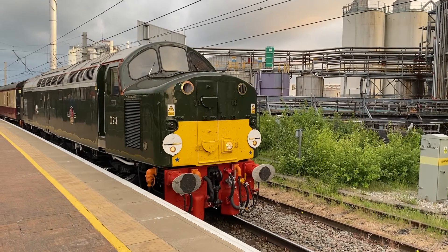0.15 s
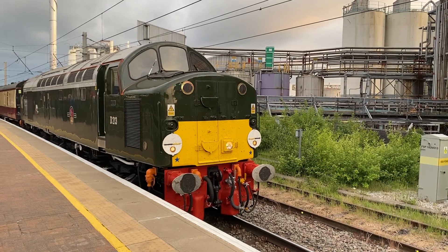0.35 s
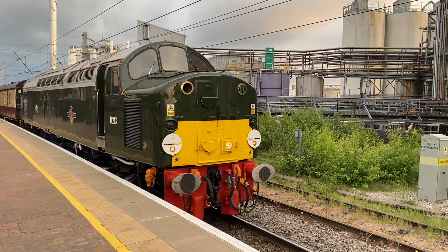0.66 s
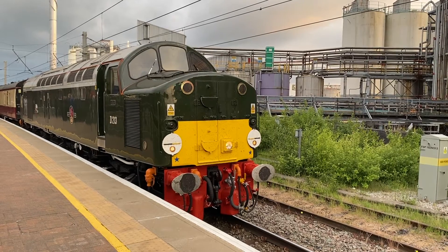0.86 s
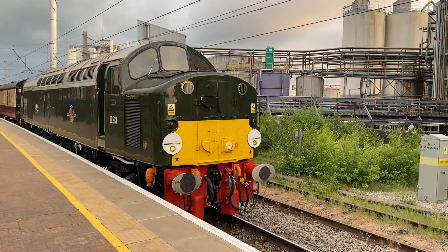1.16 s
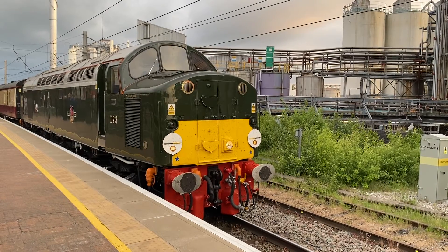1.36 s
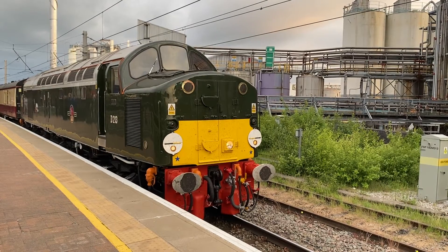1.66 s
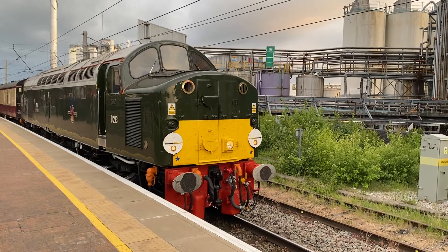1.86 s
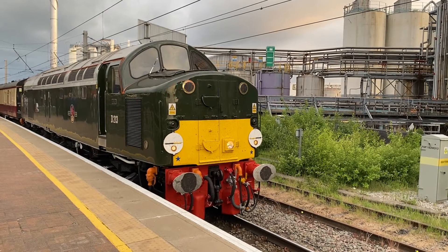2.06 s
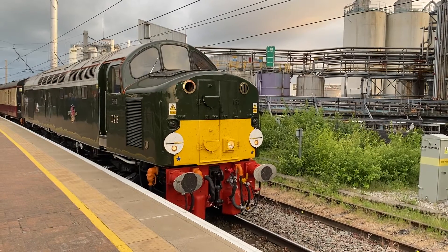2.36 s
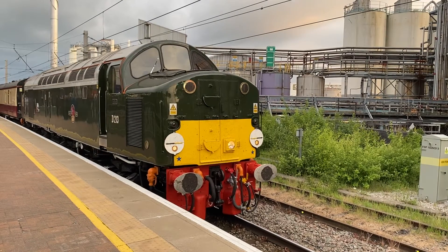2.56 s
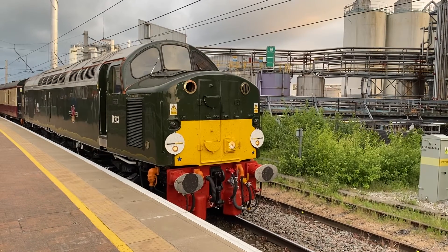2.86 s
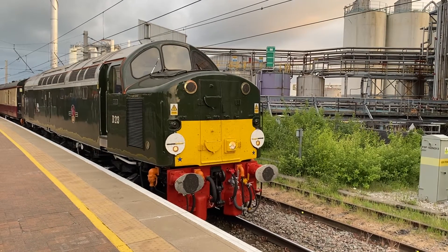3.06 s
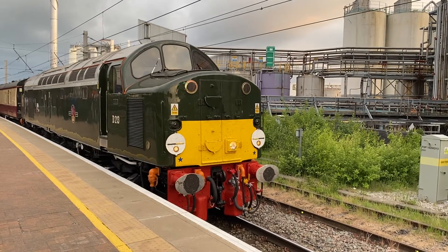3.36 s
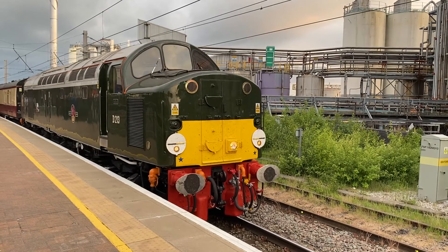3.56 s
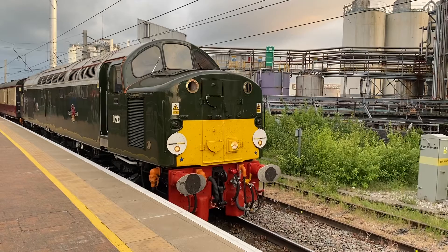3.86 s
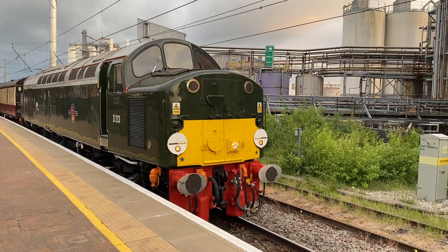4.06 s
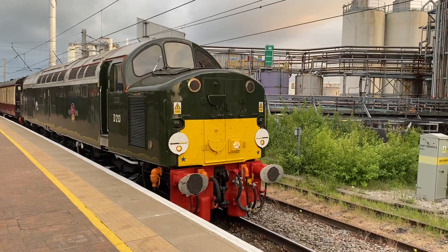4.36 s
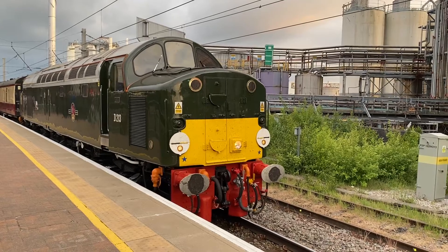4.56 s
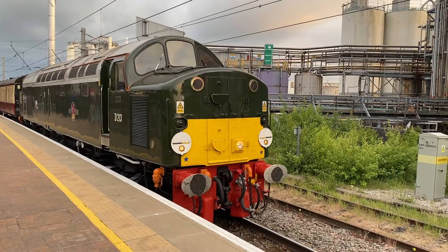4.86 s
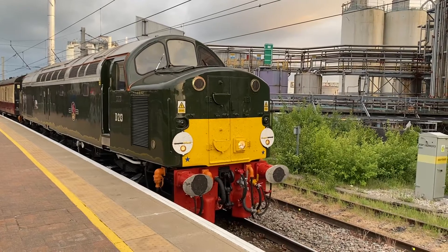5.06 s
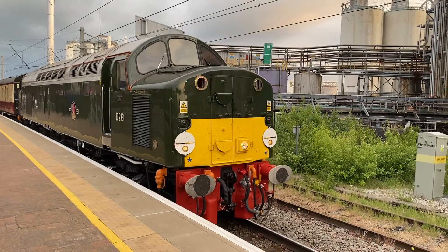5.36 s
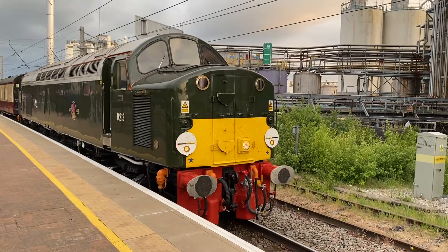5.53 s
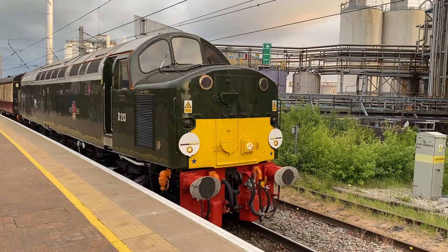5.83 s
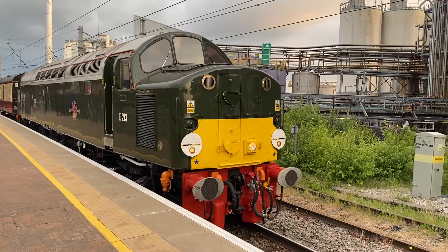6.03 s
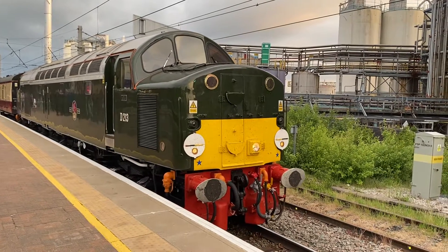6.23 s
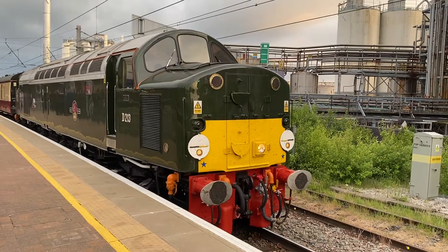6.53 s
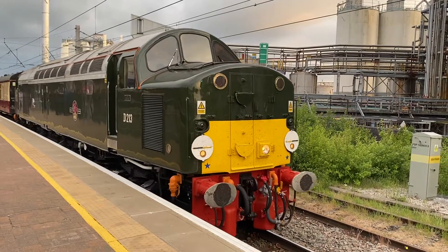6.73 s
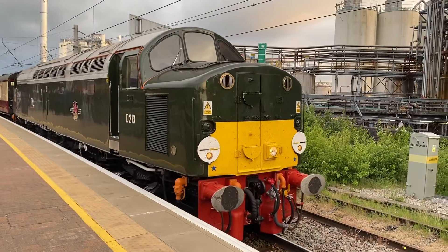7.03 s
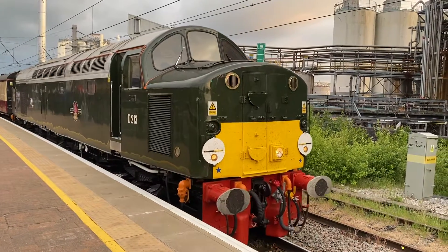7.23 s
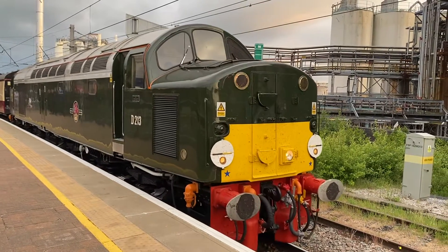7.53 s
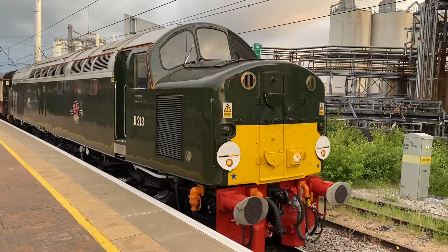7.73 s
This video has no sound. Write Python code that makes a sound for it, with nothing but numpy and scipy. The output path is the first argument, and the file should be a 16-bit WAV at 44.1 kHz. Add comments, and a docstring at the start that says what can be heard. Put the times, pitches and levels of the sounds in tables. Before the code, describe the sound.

A diesel locomotive draws slowly out of a station, heard from the platform. Its deep engine throbs and chuffs in a limping beat, gently speeding up and slowing over a steady rush of cooling fans. A high, breathy turbocharger whistle pulses with the exhaust, and a few dull metal knocks sound. Near the end the engine takes more power: the beats harden into loud barks and the whistle climbs in pitch.

```python
"""Diesel locomotive pulling out

A sixteen-cylinder diesel draws slowly out of a station, heard from the platform over its fans.
Its governor hunts; the exhaust throbs and chuffs in a limping beat, and the turbocharger whistles
with each gust. After six seconds it takes more power: the beats harden into barks, the whistle climbs."""
import sys
import numpy as np
from scipy import signal
from scipy.fft import rfft, irfft, next_fast_len
from scipy.io import wavfile

SR = 44100
rng = np.random.default_rng(int(sys.argv[2]) if len(sys.argv) > 2 else 0)


def generate_wav(signal):
    """Clip the signal to [-1, 1] and save it as 16-bit WAV at the path in sys.argv[1]."""
    frames = np.transpose(np.atleast_2d(signal))
    scaled = np.clip(frames, -1, 1) * 32767
    pcm = np.round(scaled).astype(np.int16)
    wavfile.write(sys.argv[1], SR, pcm)


N = 347949
TIME = np.arange(N) / SR
TOP_HZ = 15900

# crankshaft speed as the governor hunts: t/s, speed/rpm
CRANK_SPEED = [(0.0, 453.7), (0.9, 446.0), (2.15, 482.4), (2.45, 480.8), (3.3, 448.1), (3.8, 448.6),
               (4.75, 478.4), (5.2, 479.0), (5.95, 431.5), (6.3, 430.3), (6.9, 451.6), (7.89, 448.4)]
# the limp, cylinders in firing order: chuff/dB, turbine gust/dB, thump/dB, lag through the pipe/ms
CYLINDERS = [(-5, -4.5, -1, 0.5), (-10.5, -14.5, -2, -1), (-9, -16, 0.5, 6), (-6, -15.5, -2, -2.5),
             (-4, 0.5, -6, 0), (-5.5, -19, 2, -3), (-3.5, 0, -2.5, -0.5), (-9, -5.5, 1, -5.5),
             (-11.5, -13, 0.5, 0), (-3.5, -12, -0.5, -3), (-2, 0, -2, -.5), (-12, -3.5, 0.5, 0),
             (-7.5, -4, -1.5, 4), (-6.5, -4.5, -3.5, -1), (-18, -14, -3.5, 4), (-3.5, -6, 0, -2)]
# boom in the exhaust pipes: t/s, level/dB
PIPE_BOOM = [(0, -21.5), (.7, -22.5), (1.2, -20), (2.2, -19.5), (3.05, -21.5), (3.5, -20), (4.4, -20.5),
             (4.95, -20), (5.3, -21), (5.65, -21), (6.3, -20), (7.05, -19.5), (7.89, -21)]


def amp(db):
    """Decibels to gain."""
    return 10 ** (np.asarray(db) / 20)


def unit(x):
    """Scales to rms 1."""
    return x / np.sqrt(np.mean(x ** 2) + 1e-20)


def curve(rows):
    """A time table as a smooth ride, one value per sample."""
    return np.interp(TIME, *np.transpose(rows))


def read(points, hz):
    """Reads a spectrum table on a log-frequency axis."""
    f, value = np.transpose(points)
    return np.interp(np.log(hz + 1), np.log(f + 1), value)


def colour(x, points, size=8192):
    """Minimum-phase EQ with the given spectrum."""
    log_gain = np.log(amp(read(points, abs(np.fft.fftfreq(size, 1 / SR)))))
    taps = np.fft.ifft(np.exp(np.conj(signal.hilbert(log_gain)))).real[:size // 2]
    return signal.oaconvolve(x, taps[None], axes=1)[:, :N]


def band(x, lo_hz, hi_hz):
    """Band-pass."""
    return signal.sosfilt(signal.butter(2, [lo_hz, hi_hz], btype="band", fs=SR, output="sos"), x)


def wander(rate_hz):
    """Random drift of rms 1."""
    knots = rng.standard_normal(N // 20)
    return unit(np.interp(TIME * rate_hz, np.arange(len(knots)), knots))


def noise():
    """Turbulence. Every source has two rows: its direct sound and its scattered sound."""
    return rng.standard_normal((2, N))


def puff(t, rise_s, order=4):
    """An envelope that swells, peaks at rise_s and dies away; higher orders are tighter."""
    u = np.maximum(t, 0) / rise_s
    return (u * np.exp(1 - u)) ** order


def gusts(impulses, rise_s, steady, order=4):
    """Gas flow: a puff for each impulse over a steady stream."""
    return unit(steady + signal.oaconvolve(impulses, puff(TIME[:SR // 8], rise_s, order))[:N])


def count_firings(start=14.76):
    """Running count of firings: every cylinder fires once in two revolutions."""
    revolutions = np.cumsum(curve(CRANK_SPEED) / 60) / SR
    return start + revolutions * len(CYLINDERS) / 2


def valve_kicks(firings, column, scatter_db, jitter_ms):
    """One impulse for each opening exhaust valve, sized and timed by its cylinder."""
    at = np.flatnonzero(np.diff(np.floor(firings)))
    size, slip = rng.standard_normal((len(at), 2)).T
    cylinder = np.array(CYLINDERS)[firings[at + 1].astype(int) % len(CYLINDERS)]
    lag = (cylinder[:, 3] + slip * jitter_ms) * SR / 1000
    out = np.zeros(N)
    out[np.clip(at + lag.astype(int), 0, N - 1)] = amp(cylinder[:, column] + scatter_db * size)
    return out


def machinery(rush_db=-32, whine_db=-41, whine_hz=501):
    """The bed: a steady rush of cooling fans and a faint auxiliary whine."""
    # colour of the machinery behind the grilles: f/Hz, level/dB
    grille_eq = [(30, -32), (120, -11.5), (300, 0), (430, -9), (520, 0.5), (660, 3.5), (900, -9),
                 (1600, -12), (1900, -17.5), (2300, -12), (3500, -17), (4400, -19.5), (6500, -30.5),
                 (12000, -35.5), (16000, -64)]
    out = amp(rush_db + wander(10)) * unit(colour(noise(), grille_eq))
    out[0] += amp(whine_db) * unit(np.sin(2 * np.pi * whine_hz * TIME + 1.27 * wander(3)))
    return out


def knocks(t60_s=0.083, overtone=1.243, overtone_db=-5):
    """Heavy steel running gear bumps and rings briefly as the train takes up its slack."""
    # dull knocks: t/s, f/Hz, level/dB
    bumps = [(.118, 273, -14.5), (2.772, 230, -13.5), (4.034, 515, -17), (6.345, 176, -7.5)]
    out = np.zeros((2, N))
    t = TIME[:SR // 4]
    for s, hz, db in bumps:
        ring = np.sin(2 * np.pi * hz * t) + amp(overtone_db) * np.sin(2 * np.pi * hz * overtone * t)
        out[0, int(s * SR):][:len(t)] += ring * amp(db) * np.exp(-np.log(1000) * t / t60_s)
    return out


def drone(firings, waver_db=1.66, waver_rad=0.61, pipe_hz=122.6, pipe_width_hz=3.2, pipe_db=6):
    """Clean engine notes waver, and swell whenever the speed tunes them to the exhaust pipe."""
    # engine notes: vibrations per engine cycle, level/dB relative to the boom
    orders = [(16, -5), (24, -14.5), (31, -9), (44, -18.5)]
    cycle_phase = 2 * np.pi * firings / len(CYLINDERS)
    cycle_hz = curve(CRANK_SPEED) / 60 / 2
    notes = np.zeros(N)
    for k, db in orders:
        in_tune = np.exp(-((k * cycle_hz - pipe_hz) / pipe_width_hz) ** 2)
        gain = amp(db + pipe_db * in_tune + waver_db * wander(3.416))
        notes += gain * np.sin(k * cycle_phase + waver_rad * wander(5))
    return np.sqrt(2) * np.outer([1, 0], notes * amp(curve(PIPE_BOOM)))


def turbine_flow(firings, delay_s=0.0058, width_s=0.00567, steady=0.251):
    """The manifold rounds each gust into an even swell on its way to the turbine."""
    t = np.arange(-SR // 20, SR // 20) / SR
    swell = np.exp(-((t - delay_s) / width_s) ** 2)
    kicks = valve_kicks(firings, column=1, scatter_db=1.5, jitter_ms=1.0)
    return unit(steady + signal.oaconvolve(kicks, swell, "same"))


def smear(tone, spread_hz):
    """Turbulence blurs a tone into a breathy band, spread_hz to either side."""
    lowpass = signal.butter(3, spread_hz, fs=SR, output="sos")
    return unit((tone * signal.sosfilt(lowpass, noise() + 1j * noise())).real)


def turbo(firings, breath_db=-2.5, surge_hz=5):
    """The blade note and its octave, pumped by each gust of exhaust, rougher as the rotor speeds up."""
    # blade note: t/s, f/Hz
    blade_note = [(0, 2868), (.75, 2855), (1.3, 2882), (2.2, 2934), (3.45, 2868), (4.2, 2924), (5, 3026),
                  (5.5, 3024), (5.9, 2962), (6.55, 3106), (7.1, 3325), (7.89, 3590)]
    # whistle fader: t/s, level/dB
    whistle_level = [(0, -30), (.9, -29.5), (1.9, -28), (3.4, -29.5), (4.9, -26), (5.7, -34), (6.35, -21.5),
                     (7.1, -21.5), (7.6, -26.5), (7.89, -32)]
    flow, pitch = turbine_flow(firings), curve(blade_note)
    boost = (pitch - pitch.min()) / np.ptp(pitch)
    tone = np.exp(2j * np.pi * np.cumsum(pitch + surge_hz * (flow - 1)) / SR)
    breath = amp(breath_db) * smear(tone, spread_hz=45)
    fuzz = amp(-7 + 12 * boost) * smear(tone, spread_hz=150)
    # the core of the note is unbroken but its pitch flutters, more so at high boost
    flutter_hz = 21 * (1 + 2 * boost) * np.array([wander(90), wander(90)])
    fluttering = tone * np.exp(2j * np.pi * np.cumsum(flutter_hz, axis=1) / SR)
    core = 1.9 * (1 - .7 * boost) * unit(fluttering.real * [[1], [.85]])
    octave = unit(smear(tone ** 2, spread_hz=115) + .5 * unit((fluttering ** 2).real))
    chirps = amp(-20 - 4 * boost) * octave * flow  # stands out on the strongest gusts
    return amp(curve(whistle_level)) * flow * unit(breath + fuzz + core + chirps)


def throb(firings, churn_db=-2):
    """The low end: pressure pulses boom in the pipes, each trailed by churning gas."""
    # colour of the pipes: f/Hz, level/dB
    pipe_eq = [(20, -43), (32, -15.5), (48, -6), (62, 4), (95, -5.5), (125, -3), (190, -11.5), (300, -19.5),
               (430, -27), (800, -32), (2000, -61.5), (6000, -95)]
    pulses = valve_kicks(firings, column=2, scatter_db=2.0, jitter_ms=1.526)
    gas = amp(churn_db) * noise() * gusts(pulses, rise_s=0.0069, steady=0.52)
    gas[0] += unit(pulses - pulses.mean())
    return amp(curve(PIPE_BOOM)) * unit(colour(gas, pipe_eq))


def chuffs(firings, roar_db=-32, hiss_db=-44, sing_db=-7, effort_cap_db=7):
    """Gas rushes from the stack in uneven puffs that grow with effort, up to a cap."""
    # colour of a soft chuff: f/Hz, level/dB
    chuff_eq = [(110, -20.5), (250, -0.5), (420, -5), (540, -1.5), (680, -6.5), (1000, -7.5), (1350, -15),
                (1550, -11.5), (2000, -20), (3500, -12), (4400, -18), (5400, -22), (7500, -24.5),
                (12000, -38.5), (15500, -42)]
    # two swings of the governor, then more power: t/s, effort/dB above light running
    effort = [(0, -1), (.8, 0), (1.85, 3), (2.8, -1), (3.5, 0.2), (4.1, 3.5), (4.9, 5), (5.55, 0.5),
              (5.95, 2.5), (6.3, 9), (6.8, 17), (7.4, 14), (7.89, 11.5)]
    effort_db = np.minimum(curve(effort), effort_cap_db)
    beats = valve_kicks(firings, column=0, scatter_db=1.5, jitter_ms=0.4)
    rush = noise() * gusts(beats, rise_s=0.0075, steady=0.55, order=2)
    jet = noise() * gusts(beats, rise_s=0.0055, steady=0.36, order=3)
    roar = unit(band(colour(rush, chuff_eq), 215, 2420))
    hiss = unit(band(colour(jet, chuff_eq), 1950, TOP_HZ))
    sing = amp(sing_db) * unit(band(jet, 3810, 4680))  # the jet sets the stack's metal singing
    return roar * amp(roar_db + effort_db) + (hiss + sing) * amp(hiss_db + effort_db)


def stack_ring(t, note_hz, spread=0.026, rise_s=0.022, gain_db=1):
    """The hollow note of the stack; the heat of each slug of gas detunes its weaker modes a little."""
    # modes of the stack: multiple of its note, level/dB
    stack_modes = [(0.589, -11), (0.801, -13), (1, 0.5), (1.09, -8), (1.52, -9.5)]
    multiple, db = np.transpose(stack_modes)
    detune = spread * rng.standard_normal(len(db)) * (db < db.max())
    cycles = np.outer(t, note_hz * multiple * (1 + detune)) + rng.random(len(db))
    ring = np.sin(2 * np.pi * cycles) @ amp(db)
    return amp(gain_db) * unit(ring) * puff(t, rise_s, order=7)


def barks(rise_s=0.02, trail_db=-17, body_db=-5, punch_db=-1, bore_db=-3):
    """Exhaust accents, each its own mix of hissing crack, hollow stack ring and low thud in the pipes."""
    # exhaust barks, light and hard, and a few low swells of the boom:
    # t/s, crack/dB, stack ring/dB, ring f/Hz, thud/dB, thud f/Hz
    accents = [(0.624, -37, -47, 855, -30, 165), (0.727, -41, -42, 900, -30, 60),
               (1.424, -35, -40, 990, -20, 115), (1.455, -44, -42, 865, -30, 70),
               (1.617, -31, -35, 850, -28, 75), (1.778, -39, -38, 920, -30, 60),
               (1.935, -32, -34, 987, -30, 136), (1.963, -38, -37, 920, -30, 65),
               (3.714, -42, -42, 1123, -23, 120), (3.838, -36, -38, 850, -34, 135),
               (4.009, -34, -42, 1005, -30, 60), (4.038, -35, -36, 850, -10.5, 65),
               (4.103, -34, -38, 907, -32, 121), (4.203, -33.5, -39, 1015, -32, 65),
               (4.267, -39, -42, 1065, -28, 151), (4.299, -37, -42, 1080, -30, 65),
               (4.364, -39, -40, 995, -32, 60), (4.462, -33, -42, 895, -30, 110),
               (4.525, -28.5, -42, 936, -30, 121), (4.554, -38, -34, 924, -32, 125),
               (4.619, -38, -28, 980, -27, 126), (4.78, -33, -34, 885, -36, 110),
               (4.809, -38, -45, 915, -28, 70), (4.871, -35, -40, 925, -30, 55),
               (4.968, -38, -45, 865, -37, 135), (5.029, -30.5, -42, 905, -30, 65),
               (6.082, -27.5, -44, 990, -30, 65), (6.115, -30.5, -30, 893, -9, 65),
               (6.185, -27, -21.5, 1009, -22, 60), (6.237, -33, -25, 845, -32, 110),
               (6.292, -24, -26, 915, -17.5, 135), (6.357, -22, -22, 937, -15, 105),
               (6.394, -27, -31, 966, -22, 70), (6.461, -24.5, -19.5, 1025, -12.5, 105),
               (6.515, -35, -24, 852, -12, 150), (6.565, -22, -30, 1024, -13, 104),
               (6.632, -21.5, -23.5, 1143, -15.5, 113), (6.663, -21.5, -24.5, 1012, -30, 55),
               (6.733, -21, -20.5, 900, -30, 70), (6.783, -30, -42, 880, -18, 55),
               (6.834, -19, -26.5, 935, -11.5, 85), (6.9, -20, -24.5, 927, -27, 80),
               (6.932, -22.5, -21, 945, -13, 70), (7, -23, -22, 1003, -10, 65),
               (7.047, -32, -45, 1035, -23, 60), (7.101, -22, -24.5, 941, -7.5, 70.4),
               (7.166, -22, -19.5, 990, -21, 110), (7.196, -26, -28.5, 954, -5.5, 70),
               (7.264, -24.5, -21.5, 1042, -30, 60), (7.315, -36, -26, 1035, -32, 135),
               (7.368, -21.5, -31, 876, -19, 95), (7.431, -22.5, -20, 931, -22, 125),
               (7.468, -27, -31, 880, -12, 70), (7.51, -34, -40, 860, -10, 65),
               (7.531, -27, -19, 896, -24, 75), (7.634, -23.5, -28, 860, -16.5, 95),
               (7.704, -25, -44, 925, -8.5, 109), (7.732, -27, -23, 929, -7.5, 69),
               (7.802, -29, -22.5, 856, -23, 70), (7.845, -34, -39, 990, -30, 129)]
    # colour of a bark: f/Hz, level/dB
    bark_eq = [(70, -9.5), (170, -3.5), (420, -4.5), (570, -3), (760, -7), (930, 1), (1080, -1),
               (1270, -13), (1500, -10), (2400, -15.5), (4200, -15.5), (5500, -23.5), (8000, -28),
               (11500, -34.5), (15500, -38.5)]
    t = TIME[:SR // 8]
    crack_shape = np.hypot(puff(t, rise_s, order=18), amp(trail_db) * puff(t, rise_s=0.049, order=3))
    body_shape = puff(t, rise_s, order=5)
    thud_shape = puff(t, rise_s=0.027, order=5)
    crack_env, body_env, tones = np.zeros((3, N))
    for s, crack_db, ring_db, ring_hz, thud_db, thud_hz in accents:
        start = int((s - rise_s) * SR)
        span, length = slice(start, start + len(t)), min(len(t), N - start)
        thud = np.cos(2 * np.pi * thud_hz * (t - rise_s)) * thud_shape  # a crest lands on the cue
        bore_hz = 560 * (1 + 0.052 * rng.standard_normal())  # the lower note of the stack's bore
        bore = np.sin(2 * np.pi * (bore_hz * t + rng.random())) * body_shape
        ring = amp(ring_db) * stack_ring(t, ring_hz)
        crack_env[span] += amp(crack_db) * crack_shape[:length]
        body_env[span] += amp(ring_db + body_db) * body_shape[:length]
        tones[span] += (ring + amp(crack_db + bore_db) * bore + amp(thud_db) * thud)[:length]
    gas = colour(noise(), bark_eq)
    blast = unit(band(gas, 2660, TOP_HZ)) + amp(punch_db) * unit(band(gas, 130, 830))
    body = unit(band(gas, 410, 1500))
    return crack_env * blast + body_env * body + np.outer([1, 0], tones)


def echoed(x):
    """Adds the near reflections, which comb the sound and give it a hard, tinny edge."""
    # echoes off the platform, the body side and the works across the line: delay/ms, level/dB
    echoes = [(3.1, -30.5), (5.3, -22), (8.7, -17.5), (23, -13)]
    out = x.copy()
    for ms, db in echoes:
        lag = int(ms * SR / 1000)
        out[:, lag:] += amp(db) * x[:, :N - lag]
    return out


def stereo_image(pair):
    """Direct sound reaches the left side first; scattered sound differs between sides, adding width."""
    # balance: f/Hz, left minus right/dB
    balance = [(60, -1.3), (125, 2.5), (220, 1.5), (480, 1.5), (740, 4.5), (1000, 2), (1800, -0.3),
               (2300, 2), (2900, 7.5), (3600, 2.5), (4500, -1.5), (6000, 4.5), (8000, 0)]
    # how alike the two sides are: f/Hz, likeness (0 to 1)
    likeness = [(60, .93), (125, .86), (250, .88), (700, .82), (1500, .85), (2200, .62), (2900, .84),
                (4400, .84), (5500, .62), (7000, .88), (12000, .86)]
    # lead of the left side: f/Hz, phase/rad
    left_lead = [(0, 0), (230, .05), (600, .5), (1300, 1), (2100, 1.9), (3100, 2.5), (3550, 3.5),
                 (3750, 5.5), (4600, 6.4), (5900, 8), (6800, 6.4), (7500, 6), (8800, 3.2), (10600, .2),
                 (12700, -2.5)]
    size = next_fast_len(N + SR // 100)
    hz = np.fft.rfftfreq(size, 1 / SR)
    same, tilt = read(likeness, hz), amp(read(balance, hz))
    direct, scattered = rfft(pair, size) * np.sqrt([(1 + same) / 2, (1 - same) / 2])
    left = (direct + scattered) * tilt * np.exp(1j * read(left_lead, hz))
    right = direct - scattered
    equal_power = np.sqrt(2 / (1 + tilt ** 2))
    return irfft(np.array([left, right]) * equal_power, size)[:, :N]


def scene():
    """One crankshaft drives throb, drone, chuffs and turbo gusts; barks and knocks fall on their cues."""
    firings = count_firings()
    exhaust = throb(firings) + drone(firings) + echoed(chuffs(firings) + barks())
    return stereo_image(exhaust + turbo(firings) + machinery() + knocks())


def record(dry, knee=0.7):
    """Soft-clips the highest peaks, then cuts the extreme treble."""
    over = np.maximum(abs(dry) - knee, 0)
    rounded = dry - np.sign(dry) * (over - (1 - knee) * np.tanh(over / (1 - knee)))
    lowpass = signal.firwin(511, TOP_HZ, window=("kaiser", 9), fs=SR)
    return signal.oaconvolve(rounded, lowpass[None], "same", axes=1)


dry = scene()
out = record(dry)
generate_wav(out)
```